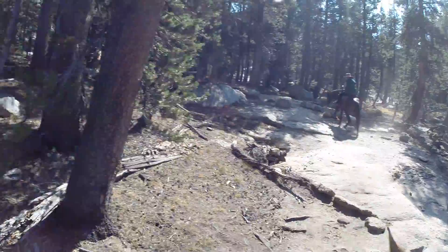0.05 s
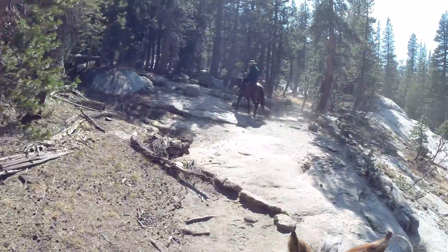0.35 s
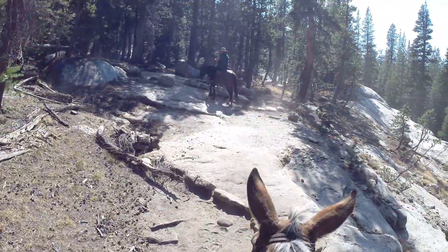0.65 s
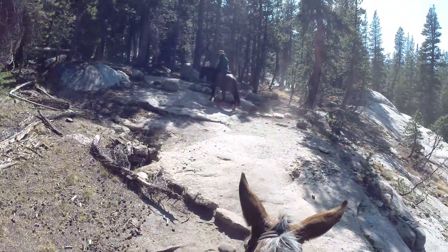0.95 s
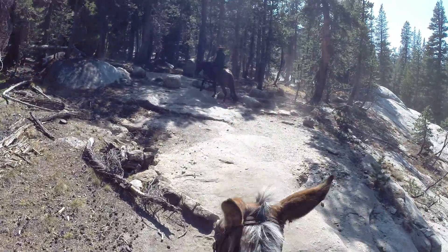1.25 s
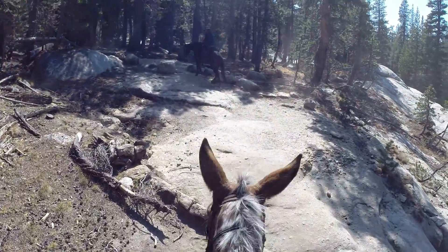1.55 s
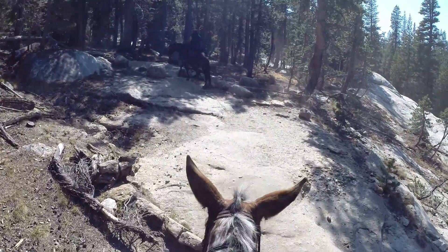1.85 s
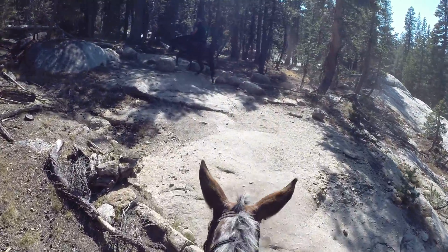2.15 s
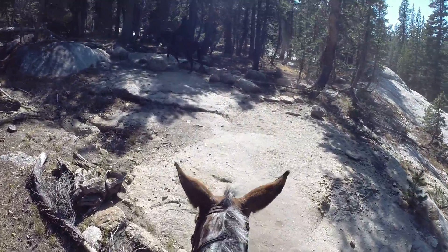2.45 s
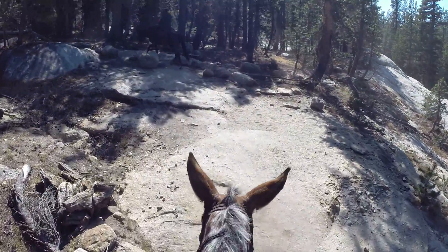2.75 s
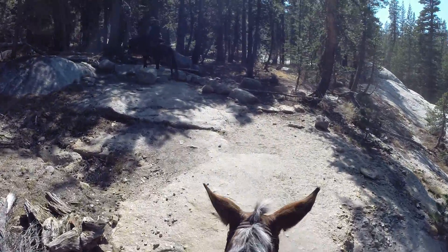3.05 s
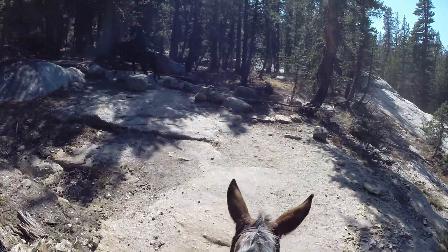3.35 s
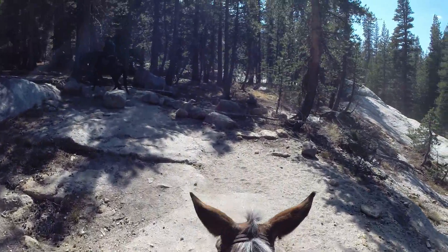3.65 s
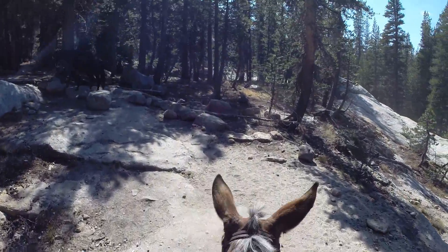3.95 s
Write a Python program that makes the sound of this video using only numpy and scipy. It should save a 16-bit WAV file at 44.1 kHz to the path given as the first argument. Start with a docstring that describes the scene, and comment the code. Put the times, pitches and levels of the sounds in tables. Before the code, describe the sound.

Heard from the saddle, a mule walks along a rocky forest trail, its hooves clopping and lightly scraping grit. Low wind gusts and dull buffets build on the microphone, and the hardest hoof strike comes near the end.

```python
"""Hooves knock on bare granite just below the microphone: mules on a forest trail, heard from the saddle.
Each blow rings hoof and rock; a flat landing cups air into a hollow clop, pinched pebbles clink,
and grit crunches under a sliding hoof. Gusts rumble and flutter right on the microphone, with dull
low buffets. Farther off, trunks and rock scatter the steps over a faint forest hush."""
import sys
import numpy as np
from scipy import signal
from scipy.fft import rfft, irfft, next_fast_len
from scipy.io import wavfile
from scipy.ndimage import uniform_filter1d

SR = 44100
rng = np.random.default_rng(int(sys.argv[2]) if len(sys.argv) > 2 else 0)


def output_pcm(signal):
    """Save a mono or channel-first signal as 16-bit PCM at the path in sys.argv[1].

    Samples are clipped to [-1, 1] before scaling.
    """
    pcm = np.clip(np.atleast_2d(signal).T, -1, 1) * 32767
    wavfile.write(sys.argv[1], SR, np.round(pcm).astype(np.int16))


N = 176400  # 4 s
TOP_HZ = 15000


def undb(db):
    """Decibels to gain."""
    return 10 ** (np.asarray(db) / 20)


def unit(x):
    """Scale to an rms of 1."""
    return x / np.sqrt(np.mean(x ** 2) + 1e-20)


def crest(x, db):
    """Set the rms level of the loudest 1.5 ms."""
    return x * undb(db) / np.sqrt(uniform_filter1d(x ** 2, 66).max() + 1e-20)


def add(out, start, x):
    """Mix a sound in at its start time in seconds."""
    i = max(int(start * SR), 0)
    out[i:i + len(x)] += x[:max(N - i, 0)]


def colour(x, points):
    """Minimum-phase filter through points of (frequency [Hz], gain [dB])."""
    hz, db = np.array(points, float).T
    n = 2 * next_fast_len(len(x))
    f = np.arange(n // 2 + 1) * SR / n
    cepstrum = irfft(np.log(undb(np.interp(np.log(f + 1), np.log(hz), db))))
    cepstrum[1:n // 2] *= 2
    cepstrum[n // 2 + 1:] = 0
    return irfft(rfft(x, n) * np.exp(rfft(cepstrum)))[:len(x)]


def ring(x, modes):
    """Resonances (frequency [Hz], half width [Hz], gain [dB]); neighbours swing in opposite sense."""
    out = 0
    for k, (hz, width, db) in enumerate(modes):
        band = signal.butter(2, [hz / (1 + width / hz), hz + width], "band", fs=SR, output="sos")
        out += (-1) ** k * undb(db) * signal.sosfilt(band, x)
    return out


# spectrum of the forest air (frequency [Hz], gain [dB])
HUSH_SPECTRUM = [(180, -6.5), (300, -3), (597, -4.5), (1040, -12.5), (1350, -16.5), (1850, -18.5),
                 (3220, -21), (3920, -24.5), (5620, -28.5), (11900, -38), (15000, -49)]

def forest_hush():
    """The trees all around the trail give a faint, steady hush."""
    return undb(-55) * unit(colour(rng.standard_normal(N), HUSH_SPECTRUM))


def forest_scatter(x, t60_s=0.55, level_db=-23):
    """Trunks and rock beside the trail send back a faint, dull tail."""
    t = np.arange(SR // 2) / SR
    spectrum = [(200, -11.5), (900, -2), (1700, -3.5), (3000, -3.5), (12000, -13.5)]
    tail = colour(rng.standard_normal(len(t)), spectrum) * np.exp(-np.log(1000) * t / t60_s)
    return undb(level_db) * signal.fftconvolve(x, tail / np.sqrt(np.sum(tail ** 2)))[:N]


def turbulence(spectrum, smooth_s):
    """Swirling air pressure: coloured noise with its slow swells evened out."""
    swirl = colour(rng.standard_normal(N), spectrum)
    power = np.abs(signal.hilbert(swirl)) ** 2 / 2
    return swirl / np.sqrt(uniform_filter1d(power, int(smooth_s * SR)))


# gusts at the microphone (time [s], rumble level [dB], flutter level before trim [dB])
GUSTS = [(0.0, -42.5, -48.5), (0.29, -42.5, -54), (0.48, -62, -66), (0.519, -42, -38.5), (0.57, -47, -67),
         (0.82, -38, -59), (0.87, -57, -47), (0.9, -37, -42.5), (1.261, -25.5, -42), (1.292, -45.5, -53),
         (1.348, -32.5, -56), (1.428, -46, -74), (1.468, -27.5, -40), (1.55, -26, -50.5),
         (1.58, -33.5, -45), (1.79, -29.5, -36), (1.83, -34.5, -43.5), (1.88, -21.5, -30), (2.03, -23, -24),
         (2.06, -25, -32), (2.26, -27.5, -31.5), (2.34, -41, -48.5), (2.45, -32.5, -39.5), (2.48, -49, -50),
         (2.521, -30, -64), (2.6, -42.5, -66), (2.62, -39.5, -44), (2.872, -22.5, -27.5),
         (2.962, -34.5, -43.5), (3.011, -22, -32.5), (3.1, -24, -32.5), (3.2, -32, -38.5),
         (3.269, -21.5, -37.5), (3.34, -27, -29.5), (3.5, -25, -34), (3.519, -20, -21), (3.55, -30, -34.5),
         (3.68, -28.5, -45), (3.72, -40.5, -43), (3.92, -46.5, -57.5), (4.0, -29.5, -40)]
# deep swell under the gusts (time [s], level before trim [dB])
DEEP_SWELL = [(0.0, -54), (0.1, -36), (0.4, -58.5), (1.19, -39.5), (1.44, -64), (1.49, -46), (2.25, -31.5),
              (2.34, -40.5), (2.75, -32.5), (2.78, -23), (2.83, -35.5), (3.69, -30.5), (3.74, -53.5),
              (4.0, -35)]
# spectra of the four wind layers, lowest first (frequency [Hz], gain [dB])
SWELL_SPECTRUM = [(10, -9.5), (28, 1), (42, 3.5), (55, 1), (75, -14.5), (150, -65), (1000, -120)]
RUMBLE_SPECTRUM = [(30, -24.5), (55, -6), (78, 0.5), (115, -2.5), (155, -10), (185, -21), (240, -48),
                   (400, -80.5), (3000, -120)]
FLUTTER_SPECTRUM = [(100, -40.5), (140, -8.5), (170, 4), (210, -3.5), (280, -7), (400, -28), (600, -31),
                    (1200, -75.5), (6000, -110)]
EDDY_SPECTRUM = [(130, -24), (220, 0.5), (300, 3), (400, -1), (550, -10), (900, -25.5), (2000, -51.5),
                 (8000, -85.5)]

def wind(swell_trim_db=1.5, flutter_trim_db=-3, patch_s=0.011, strong_gust_db=-23, eddy_growth=1.59):
    """Gusts rumble and flutter on the microphone over a deep swell; the strongest shed brighter eddies."""
    t = np.arange(N) / SR
    times, rumble_levels, flutter_levels = np.array(GUSTS).T
    swell_db = np.interp(t, *np.array(DEEP_SWELL).T)
    rumble_db = np.interp(t, times, rumble_levels)
    flutter_db = np.interp(t, times, flutter_levels)
    patch_db = 4.5 * np.interp(t / patch_s, np.arange(2000), np.clip(rng.standard_normal(2000), -2, 1))
    eddy_db = -35.5 + eddy_growth * (flutter_db - strong_gust_db) + patch_db
    swell = undb(swell_db + swell_trim_db) * turbulence(SWELL_SPECTRUM, 0.15)
    rumble = undb(rumble_db) * turbulence(RUMBLE_SPECTRUM, 0.091)
    flutter = undb(flutter_db + flutter_trim_db + patch_db / 2) * turbulence(FLUTTER_SPECTRUM, 0.03)
    eddies = undb(eddy_db) * turbulence(EDDY_SPECTRUM, 0.023)
    return swell + rumble + flutter + eddies


# dull low buffets at the microphone (time [s], pitch [Hz], level [dB])
BUFFETS = [(0.784, 151, -26.5), (0.82, 126, -27), (.856, 204, -22), (0.892, 225, -31.5), (.962, 234, -26.5),
           (1.065, 162, -22), (1.139, 139, -30), (1.24, 122, -29.5), (1.644, 140, -26.5),
           (1.775, 106.5, -18), (1.888, 138, -13.5), (1.936, 136, -16), (1.983, 283, -24.5),
           (2.009, 137, -13.5), (2.168, 130, -18), (2.808, 232, -25), (2.841, 205, -23), (3.01, 190, -22.5),
           (3.061, 163, -18.5), (3.092, 169, -14.5), (3.133, 230, -21.5), (3.261, 90.5, -19),
           (3.434, 232, -26), (3.578, 198, -20.5), (3.662, 206.4, -20.5)]

def buffets(swell_s=0.0036, edge_db=-15.5):
    """Soft, close knocks of a few low cycles with a rough edge."""
    out, t = np.zeros(N), np.arange(SR // 8) / SR
    for start, hz, db in BUFFETS:
        swell = t * np.exp(-t / swell_s)
        body = np.sin(2 * np.pi * hz * t) * swell
        edge = colour(rng.standard_normal(len(t)) * swell, EDDY_SPECTRUM)
        add(out, start, crest(body, db) + crest(edge, db + edge_db))
    return out


GRAINS_PER_S = 800

def grain_clicks(spread_db):
    """Dense tiny clicks of uneven size."""
    clicks = (rng.random(N) < GRAINS_PER_S / SR) * rng.choice([-1, 1], N)
    return clicks * undb(spread_db * np.minimum(rng.exponential(size=N), 4))


def gravel(spread_db, ring_s=0.00061):
    """Grains of uneven size crack one by one, each at its own pitch."""
    out, t = np.zeros(N), np.arange(128) / SR
    for when, pitch, size in rng.random((int(GRAINS_PER_S * N / SR), 3)):
        gain = undb(spread_db * min(-np.log(1 - size), 3))
        add(out, when * N / SR, gain * np.sin(2 * np.pi * pitch * TOP_HZ * t) * np.exp(-t / ring_s))
    return unit(out)


# hooves sliding on the trail (middle time [s], half length [s], level [dB])
HOOF_SLIDES = [(.037, 0.022, -60), (0.108, 0.013, -54.5), (0.655, 0.02, -58.5), (0.971, 0.0085, -54.5),
               (1.043, 0.049, -62.5), (1.129, .0055, -54.5), (1.404, 0.013, -58.5), (1.964, .0092, -52.5),
               (2.101, 0.049, -60.5), (2.113, 0.0085, -44.5), (2.37, 0.024, -60.5), (2.44, 0.016, -61),
               (2.562, 0.014, -62.5), (2.697, 0.0043, -50.5), (2.709, .01, -57), (3.35, 0.045, -62),
               (3.554, 0.012, -51.5), (3.644, 0.037, -61), (3.816, 0.027, -60)]
# spectrum of the grit (frequency [Hz], gain [dB])
GRIT_SPECTRUM = [(600, -12), (1500, 7.5), (3400, 1.5), (5700, -1.5), (8000, -6.5), (11000, -16),
                 (13000, -22), (15000, -24.5)]

def scrapes(loose_db=-71.5, shuffle_db=-61.5):
    """Sand crunches under a sliding hoof; loose grit and soft shuffling go on between steps."""
    t = np.arange(N) / SR
    power = sum(undb(2 * db) * np.exp(-((t - mid) / half) ** 2) for mid, half, db in HOOF_SLIDES)
    crunch = unit(colour(gravel(spread_db=5.5) + 1.1 * rng.standard_normal(N), GRIT_SPECTRUM))
    loose = unit(colour(gravel(spread_db=2.5), GRIT_SPECTRUM))
    shuffle = unit(ring(grain_clicks(spread_db=2.0), [(780, 570, 9), (1450, 600, -3)]))
    return np.sqrt(power) * crunch + undb(loose_db) * loose + undb(shuffle_db) * shuffle


# pebbles caught underfoot (time [s], pitch [Hz], level [dB])
CLINKS = [(.663, 6540, -56), (1.099, 2750, -41), (1.131, 5400, -55), (1.295, 5400, -54.5),
          (1.733, 3350, -50.5), (1.87, 3580, -42.5), (2.1055, 5800, -44), (2.116, 3440, -39.5),
          (2.1224, 3420, -48), (2.695, 4550, -43.5), (2.698, 5400, -46.5), (2.7125, 4470, -53),
          (3.5251, 3400, -29.5), (3.5277, 3110, -36), (3.5432, 3500, -49)]
# modes of a pebble (frequency [x pitch], gain [dB])
CLINK_MODES = [(.72, -3), (1, 8.5), (1.66, -11), (2.55, -14.5)]

def pebbles(ring_s=0.0015):
    """A pebble pinched under a hoof clinks with a few very short modes."""
    out, t = np.zeros(N), np.arange(SR // 8) / SR
    for start, hz, db in CLINKS:
        clink = sum(undb(gain) * np.sin(2 * np.pi * k * hz * t) for k, gain in CLINK_MODES)
        add(out, start, crest(clink * np.exp(-t / ring_s), db))
    return out


# hooves landing flat (time [s], pitch [Hz], level [dB])
FLAT_LANDINGS = [(2.435, 735, -31.5), (2.972, 723, -44), (3.552, 863, -33.5)]
# modes of the hoof cup (frequency [x pitch], gain [dB])
CUP_MODES = [(1, 0), (1.082, -2), (3.148, -23)]

def clops(rise_s=0.0041, decay_s=0.0054, wobble_rad=0.33):
    """Air cupped under the hoof swells and rings briefly, a little unsteady."""
    out, t = np.zeros(N), np.arange(SR // 8) / SR
    envelope = (1 - np.exp(-t / rise_s)) / (1 + np.exp(t / decay_s - 1.5))
    for start, hz, db in FLAT_LANDINGS:
        wobble = wobble_rad * unit(uniform_filter1d(rng.standard_normal(len(t)), size=120))
        phase = 2 * np.pi * hz * t + wobble
        tone = sum(undb(gain) * np.sin(k * phase) for k, gain in CUP_MODES)
        add(out, start, crest(tone * envelope, db))
    return out


# blows on the granite below the saddle (time [s], contact decay [ms], thud level [dB], knock pitch [Hz],
# knock level [dB], clack pitch [Hz], clack level [dB], stone click level [dB])
HOOF_BLOWS = [(.087, 3.6, -63, 920, -40.5, 1300, -58, -67), (.101, 6, -46, 780, -39.5, 1240, -40, -60),
              (.373, 3.6, -41.5, 840, -46.5, 1240, -50, -75), (.394, 3.8, -47, 860, -45, 1150, -49.5, -56),
              (.508, 11.6, -38.5, 520, -63, 1290, -57, -69), (.657, 7.1, -41, 578, -35, 1300, -64, -69),
              (.718, 5.4, -37, 580, -37, 1440, -42, -53), (.733, 3.8, -38.5, 750, -51, 1400, -52, -54),
              (0.9088, 1.7, -33, 555, -31, 1290, -29.5, -43.5), (1.044, .6, -38, 710, -59, 1510, -55, -43),
              (1.0575, 1.7, -47, 655, -43, 1350, -47, -37), (1.0985, 3, -55, 1320, -60, 1410, -43.5, -51),
              (1.23, 4.7, -40.5, 554, -35.5, 1240, -47, -56.5),
              (1.377, 22, -55, 885, -49, 1350, -48.5, -65),
              (1.7614, 9.1, -35, 690, -38, 1370, -41.5, -54.5),
              (1.869, 3.9, -37, 636, -31.5, 1290, -43, -45), (1.919, 2.7, -42, 960, -40, 1130, -47, -52),
              (2.084, 4.3, -31.5, 650, -44, 1190, -46.5, -54),
              (2.295, 14, -38, 715, -39.5, 1480, -44.5, -57),
              (2.424, 4.5, -37.5, 770, -32.5, 1150, -46, -45),
              (2.633, 7.1, -40.5, 600, -44, 1300, -56.5, -65),
              (2.6873, 2.5, -60, 854, -32.5, 1380, -41, -52),
              (2.696, 9.6, -67, 926, -44.5, 1320, -41, -49.5), (2.957, 7, -34, 805, -32.5, 1150, -57, -54),
              (3.068, 7.4, -60.5, 900, -40.5, 1200, -60, -56.5),
              (3.268, 5, -59, 780, -33, 1400, -47.5, -52), (3.5251, 2.7, -56, 940, -38, 1280, -55, -36),
              (3.5385, 5.6, -59, 830, -37, 1200, -59, -46), (3.6195, 1.3, -21.5, 600, -29, 1090, -53, -58),
              (3.6271, 3.3, -24.5, 782, -20, 1970, -30, -58), (3.63, 2, -20, 730, -24.5, 1130, -25, -62),
              (3.726, 40, -39, 824, -47, 1300, -50, -54), (3.801, 10, -43, 1040, -43.5, 1310, -59, -59),
              (3.968, 0.99, -44, 613, -48, 1170, -52.5, -63)]
# low resonances of hoof and rock (frequency [Hz], half width [Hz], gain [dB])
THUD_MODES = [(308, 320, -4.5), (510, 175, -5.5)]
# hoof wall on rock (frequency [x clack pitch], half width [x frequency], gain [dB])
CLACK_MODES = [(1, 0.19, 8.5), (1.42, 0.43, -9), (2.02, 0.39, -10)]
# spectrum of the stone's click (frequency [Hz], gain [dB])
CLICK_SPECTRUM = [(1200, -7.5), (2400, 13), (3400, 7.5), (5600, -3), (10500, -19), (15000, -35)]

def hoof_strikes(push_s=0.0001, rattle_gain=0.29, tail_db=-28, tail_s=0.027, knock_q=2.87):
    """Each blow is a short push and a gritty rattle; they ring hoof and rock, and the stone clicks."""
    out, t = np.zeros(N), np.arange(SR // 8) / SR
    push = 0.86 * t / push_s * np.exp(-t / push_s)
    attack = 1 - np.exp(-t / 0.000052)
    tail = undb(tail_db) * np.exp(-t / tail_s)
    lowpass = signal.butter(4, 3600, fs=SR, output="sos")
    for start, decay_ms, thud_db, knock_hz, knock_db, clack_hz, clack_db, click_db in HOOF_BLOWS:
        contact = np.exp(-1000 * t / decay_ms)
        rattle = rng.standard_normal((4, len(t))) * (contact + tail) * attack
        force = push + rattle_gain * rattle
        thud = crest(ring(force[0], THUD_MODES), thud_db)
        knock = crest(ring(force[1], [(knock_hz, knock_hz / knock_q / 2, 0)]), knock_db)
        wall_modes = [(k * clack_hz, k * clack_hz * width, db) for k, width, db in CLACK_MODES]
        clack = crest(signal.sosfilt(lowpass, ring(force[2], wall_modes)), clack_db)
        click = crest(colour(rattle[3], CLICK_SPECTRUM), click_db)
        add(out, start, thud + knock + clack + click)
    return out


def scene():
    """From the saddle, in mono: hooves below, forest all around, wind on the microphone."""
    hooves = hoof_strikes() + clops() + pebbles() + scrapes()
    hush = forest_hush()
    return (hooves + forest_scatter(hooves) + buffets() + wind() + hush)[None]


def record(dry):
    """The camera at the saddle cuts the top treble steeply."""
    return signal.sosfilt(signal.ellip(8, .2, 70, TOP_HZ, fs=SR, output="sos"), dry)


dry = scene()
out = record(dry)
output_pcm(out)
```